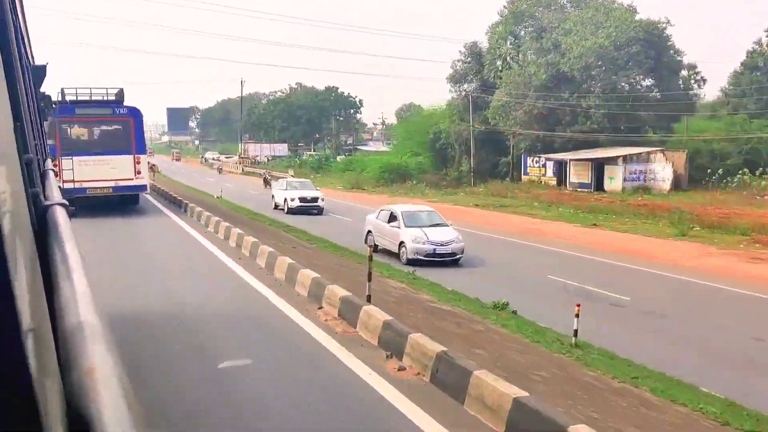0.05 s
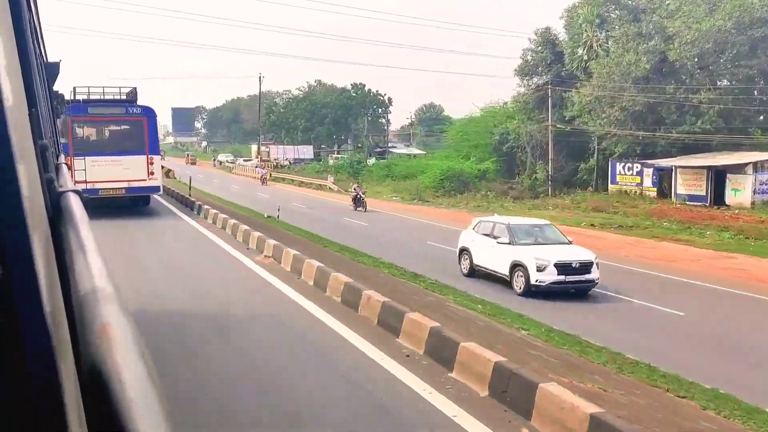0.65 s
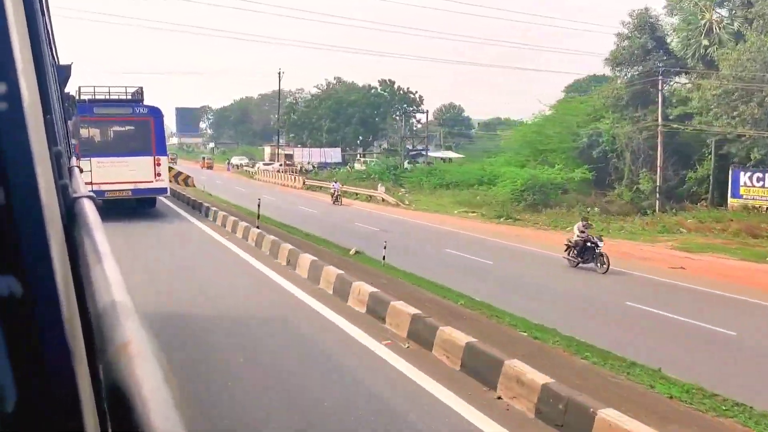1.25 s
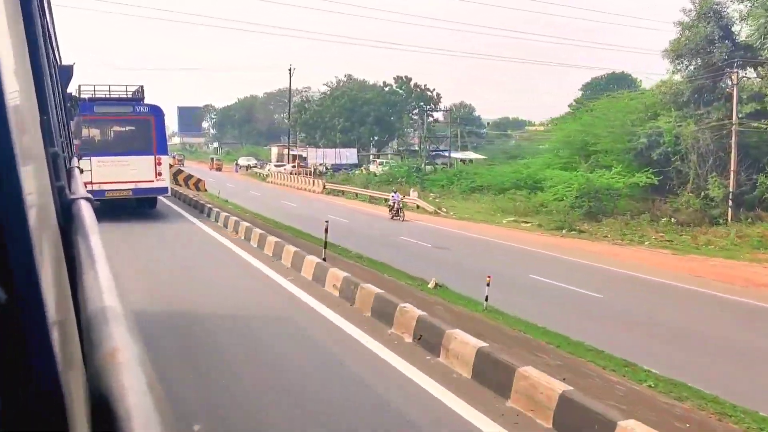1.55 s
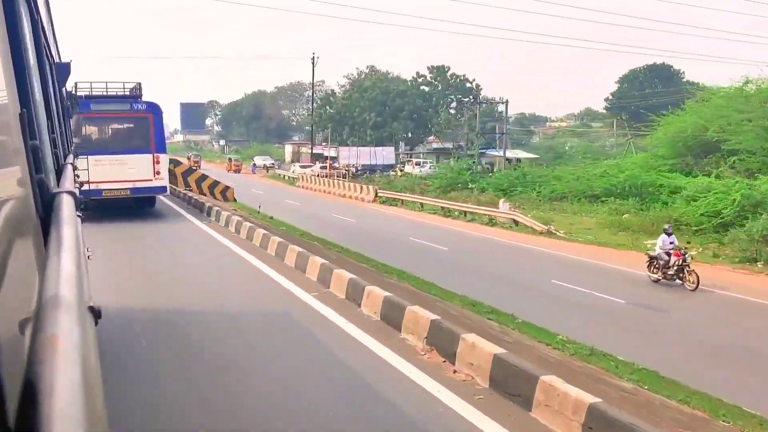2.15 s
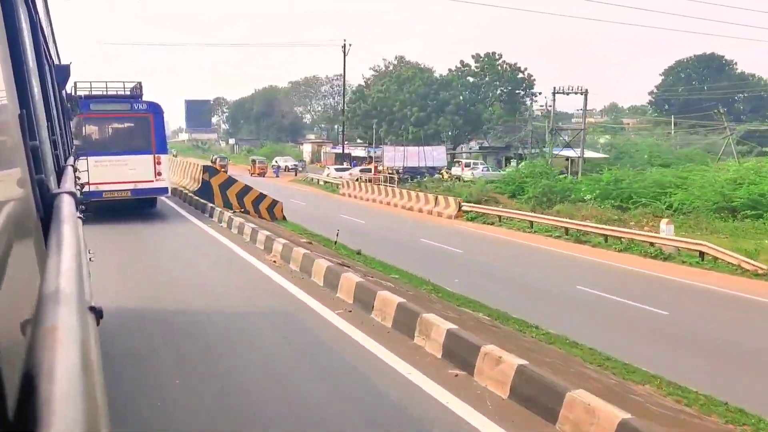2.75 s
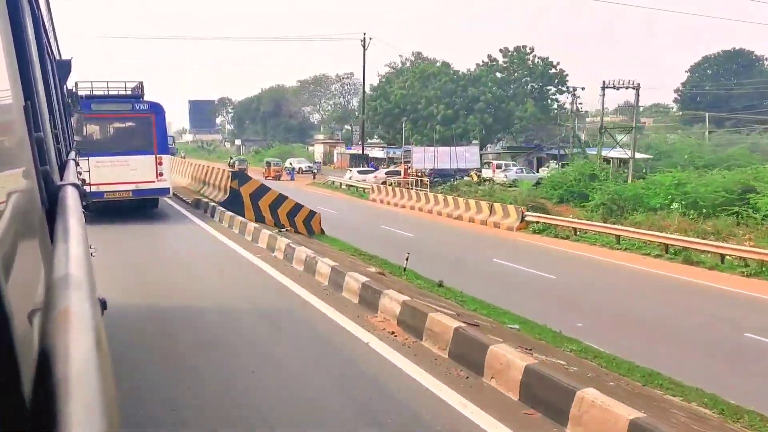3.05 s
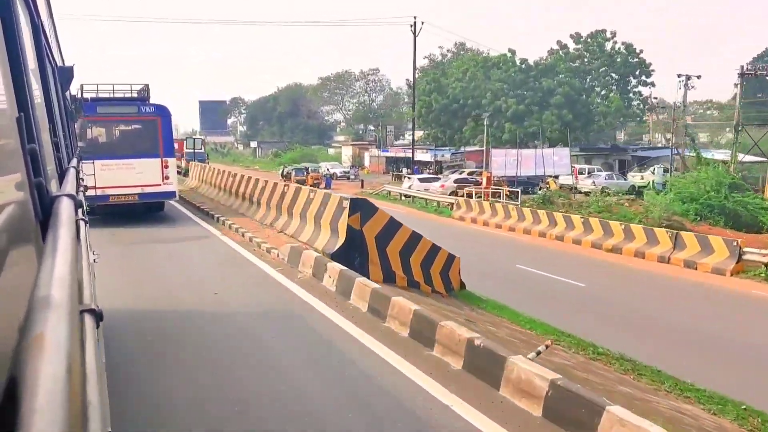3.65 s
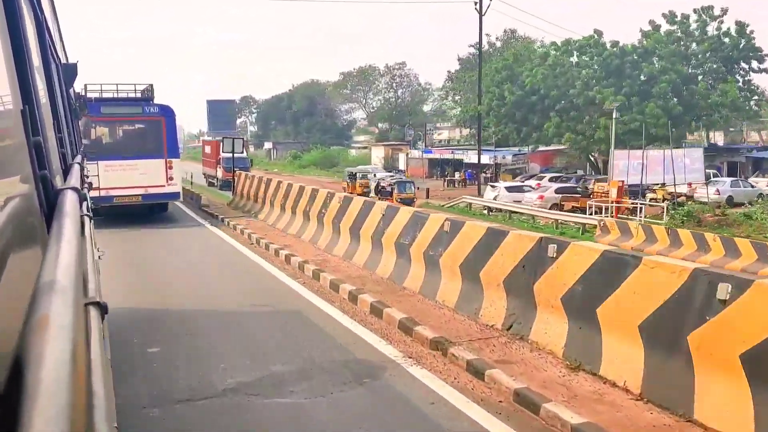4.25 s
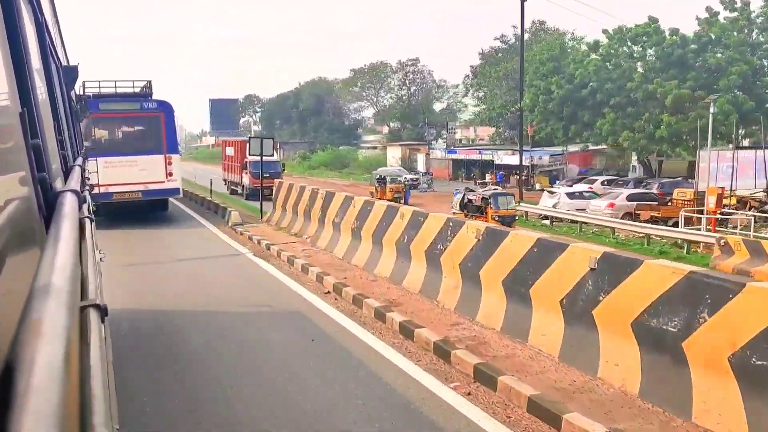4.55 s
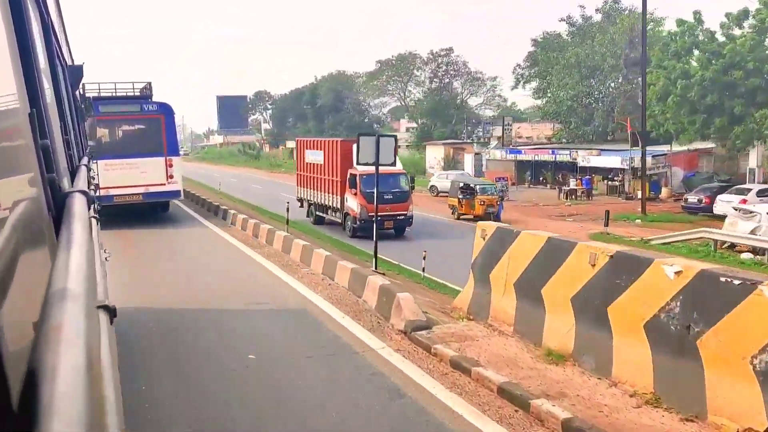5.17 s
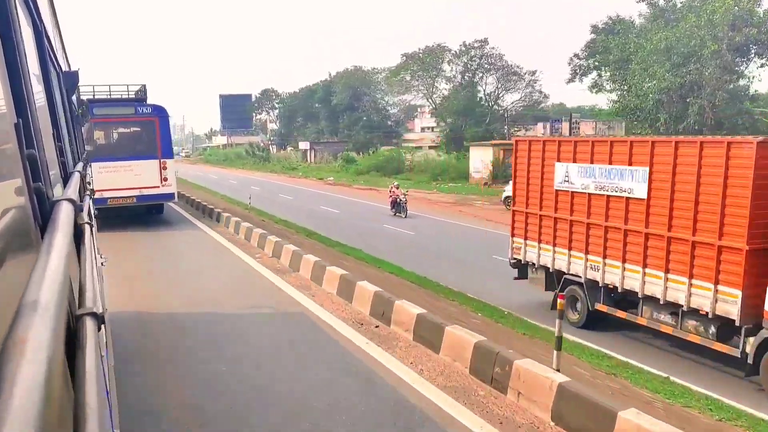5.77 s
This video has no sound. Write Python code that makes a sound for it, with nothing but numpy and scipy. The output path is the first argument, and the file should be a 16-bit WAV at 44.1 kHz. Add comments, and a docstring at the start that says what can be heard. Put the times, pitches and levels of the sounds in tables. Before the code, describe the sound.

Gusty, rumbling wind thumps against the microphone on a highway bus, with road roar behind and a pane squeaking faintly.

```python
"""Wind buffets a microphone held at the open window of a bus on a highway.
The slipstream hammers the exposed right port with eddies and rumbles more softly over the
sheltered left one. Behind it tyres and engine blur into a roar and air hisses past the frame.
The pane sticks and slips in its channel with short squeaks, and the frame ticks once."""
import sys
import numpy as np
from scipy import signal
from scipy.fft import rfft, irfft, next_fast_len
from scipy.io import wavfile
from scipy.ndimage import uniform_filter1d, minimum_filter1d, map_coordinates

SR = 44100
rng = np.random.default_rng(int(sys.argv[2]) if len(sys.argv) > 2 else 0)


def store_wav(level_fs):
    """Save 16-bit WAV to argv[1]."""
    pcm = np.round(np.clip(np.atleast_2d(level_fs), -1, 1) * 32767)
    wavfile.write(sys.argv[1], SR, pcm.T.astype(np.int16))


N = 265041
T = np.arange(N) / SR


def amp(db):
    """Decibels to gain."""
    return 10 ** (np.asarray(db) / 20)


def unit(x):
    """Scale to rms 1."""
    return x / np.sqrt(np.mean(x ** 2) + 1e-20)


def curve(rows):
    """An automation line through (seconds, value) points."""
    return np.interp(T, *np.transpose(rows))


def swells(rows):
    """A curve with one bell for each (middle s, length s, height) row."""
    t = np.arange(0, N / SR, .001)
    bells = sum(height * np.exp(-(2 * (t - s) / length) ** 2) for s, length, height in rows)
    return np.interp(T, t, bells)


def wobble(rate):
    """A smooth random curve, rate knots a second."""
    return map_coordinates(rng.standard_normal(8192), [T * rate + 2], mode="mirror")


def stray(depth_db):
    """Chance swings of level in turbulent air."""
    return depth_db * wobble(rate=18)


def filtered(x, response):
    """Equalise x with a gain given as a function of Hz."""
    size = next_fast_len(N + 8192)
    return irfft(rfft(x, size) * response(np.fft.rfftfreq(size, 1 / SR)), size)[..., :N]


def noise(spectrum):
    """Noise of rms 1 coloured by (Hz, dB) points on a log axis."""
    points_hz, db = np.transpose(spectrum)
    white = rng.standard_normal(N)
    return unit(filtered(white, lambda hz: amp(np.interp(np.log(hz + 1), np.log(points_hz + 1), db))))


def even(x, span_s):
    """Keep the fine texture of x, but hold its level at 1 over span_s."""
    window = signal.windows.hann(2 * int(span_s * SR / 2) + 3)
    power = np.abs(signal.fftconvolve(x ** 2, window / window.sum(), "same"))
    return x / np.sqrt(power + 1e-9)


def patchy(x, depth_db):
    """Give x short-lived patches of random gain over time and frequency."""
    spectra = signal.stft(x, nperseg=1024)[2]
    patches = uniform_filter1d(rng.standard_normal(spectra.shape), size=7, axis=1)
    patches = uniform_filter1d(patches, size=5, axis=2)
    return signal.istft(spectra * amp(depth_db * unit(patches)), nperseg=1024)[1][:, :N]


def swirl(level_db, spectrum, churn_db, churn_rate, span_s):
    """Turbulent pressure: noise that comes in irregular bursts, about churn_rate changes a second."""
    bursts = noise(spectrum) * amp(churn_db * 2 * np.tanh(wobble(churn_rate) / 2))
    return amp(level_db) * even(bursts, span_s)


def sheltered_wind():
    """The sheltered port rumbles softly, and more as the slipstream curls round to it."""
    # Wind reaching this port. Each row: time in seconds, relative strength in dB.
    strength = [(0.0, -5), (0.11, 0), (0.3, -4), (0.46, -6), (1.08, -5.5), (1.2, -3.5), (1.36, -8),
                (1.45, -1), (1.6, -8), (1.72, -6), (1.95, -0.5), (2.1, -4.5), (2.26, -3), (2.35, 2),
                (2.46, 7), (2.53, -0.5), (2.63, 1.5), (2.73, 2), (2.82, 3.5), (3.05, -2), (3.14, 4),
                (3.25, -1.5), (3.42, 2), (3.5, -3.5), (3.62, -2), (3.73, -5), (3.82, 4.5), (4.1, 2),
                (4.25, -0.5), (4.35, 1), (4.53, -1), (4.65, 3.5), (4.9, -0.5), (5.06, 1.5), (5.15, -5),
                (5.24, 0.5), (5.42, 1), (5.55, -0.5), (5.72, 3.5), (5.86, 5), (6.0, 1.5)]
    # Colours of the deep rumble and the buffeting above it. Each row: frequency in Hz, relative dB.
    rumble_colour = [(5, -38), (12, 4.5), (22, 4), (42, 6.5), (70, -9.5), (120, -8), (220, -31.5),
                     (700, -120)]
    buffet_colour = [(35, -34), (80, -5.5), (120, -1.5), (200, -8.5), (300, -17), (450, -29), (650, -30),
                     (1000, -50), (4000, -120)]
    flow_db = curve(strength) + stray(0.8)
    rumble = swirl(flow_db - 13.5, rumble_colour, churn_db=3.5, churn_rate=7.7, span_s=0.11)
    buffet = swirl(flow_db - 27, buffet_colour, churn_db=17, churn_rate=90, span_s=0.061)
    return rumble + buffet


def exposed_wind():
    """One airflow, with its gusts and lulls, drives rumble, buffeting, flutter and small eddies."""
    # Strong eddies crossing the port. Each row: time in seconds, level in dB, centre in Hz, thump in dB.
    strong_eddies = [(0.081, -6, 510, -2.5), (0.149, -16, 764, -24), (0.263, -13, 430, -12),
                     (0.3, -10, 580, -4), (0.538, -3.5, 437, -6), (0.763, -7, 900, -9),
                     (0.791, -11.5, 680, -5), (.865, -30, 560, -21), (0.883, -8.5, 445, -25),
                     (0.931, -11, 860, -22), (1.217, -11, 740, -7), (1.264, -9, 395, -27),
                     (1.305, -21, 480, -25), (1.316, -22, 480, -7), (1.362, -9.5, 780, -22),
                     (1.364, -4.5, 390, -6), (1.567, -9.5, 724, -17), (1.8, -9, 666, -12),
                     (1.869, -11, 690, -20), (1.92, -11.5, 600, -13), (2.12, -18, 510, -20),
                     (2.224, -7, 690, -7), (2.397, -14, 660, -12), (2.454, -15, 480, 1),
                     (2.476, -19, 423, -4), (2.863, -13, 546, -27), (3.033, -12, 520, -17),
                     (3.242, -13, 560, -9), (3.346, -7.5, 650, -16), (3.348, -8, 440, 3.5),
                     (3.395, -20, 650, -13), (3.456, -20, 500, -7), (3.46, -7, 680, -16),
                     (3.526, -11.5, 600, -9.5), (3.624, -11, 393, -17), (3.733, -9.5, 543, -9),
                     (3.772, -17, 560, -24), (3.795, -9, 556, -14), (3.823, -12, 540, -10),
                     (3.832, -15, 700, -23), (3.978, -9.5, 470, -19), (4.26, -9.5, 435, -10),
                     (4.547, -7.5, 520, -18), (4.647, -7.5, 430, -24), (4.917, -18, 490, -20),
                     (4.943, -20, 520, -8), (4.968, -7, 523, -12), (5.192, -11.5, 544, -12),
                     (5.269, -8, 340, -4), (5.669, -9, 500, -10), (5.721, -12, 452, -9)]
    # Gusts. Each row: middle in seconds, length in seconds, rise in dB.
    gusts = [(0.11, 0.1, 2.5), (0.285, 0.04, 4), (0.52, 0.081, 3), (0.96, 0.083, 3), (1.31, 0.038, 6),
             (1.87, 0.096, 5), (2.39, 0.023, 5.5), (2.462, 0.019, 2), (2.85, 0.036, 3.5), (3.1, 0.12, 5),
             (3.33, 0.043, 1.5), (3.82, 0.042, 10.5), (4.92, 0.1, 2), (5.5, 0.047, 3.5)]
    # The slipstream lifts off the port. Each row: middle in seconds, length in seconds, drop in dB.
    lulls = [(0.2, 0.04, 13), (0.41, 0.15, 4), (0.6, 0.078, 8), (0.7, 0.15, 8.5), (0.84, 0.035, 5),
             (1.14, 0.05, 4), (1.43, 0.071, 2.5), (1.68, 0.12, 4.5), (2.19, 0.055, 3), (2.31, 0.05, 5),
             (2.72, 0.18, 4), (3.425, 0.06, 2.5), (3.51, 0.031, 6), (4.05, 0.068, 1.5), (4.2, 0.03, -2),
             (4.47, 0.084, 9.5), (4.59, 0.053, 4.5), (4.79, 0.067, 6), (5.14, 0.15, 8), (5.95, 0.066, 0.5)]
    # Colours of the deep rumble and the buffeting above it. Each row: frequency in Hz, relative dB.
    rumble_colour = [(5, -37), (12, 0.5), (22, -1), (42, -3), (70, -1.5), (100, -14), (160, -30),
                     (500, -120)]
    buffet_colour = [(30, -25), (70, -3), (100, 3), (150, 1), (210, -3.5), (280, -10.5), (400, -22),
                     (1200, -120)]
    # Air rushes in with each strong eddy and slackens in its wake.
    rush_s, rush_db = 0.024, 1.5
    wake_s, wake_db, wake_lag_s = 0.026, 2.5, 0.024
    rush = np.minimum(1, swells([(s, rush_s, 1) for s, *_ in strong_eddies]))
    wake = np.minimum(1, swells([(s + wake_lag_s, wake_s, 1) for s, *_ in strong_eddies]))
    flow_db = swells(gusts) - swells(lulls) + rush_db * rush - wake_db * wake
    push_db = np.minimum(flow_db, 0.8 * flow_db)  # the lows follow all of a lull, only part of a gust
    rumble_db = -12 + push_db + stray(1.8)
    buffet_db = -16.5 + push_db + stray(2.5)
    rumble = swirl(rumble_db, rumble_colour, churn_db=3, churn_rate=61, span_s=0.15)
    buffet = swirl(buffet_db, buffet_colour, churn_db=6.5, churn_rate=90, span_s=0.079)
    stream = surges() + rumble + buffet + flutter(flow_db + stray(1.5))
    # An arriving vortex briefly shields the port: the stronger it is, the more the stream ducks.
    duck_s, duck_db, duck_lead_s = 0.016, -10, 0.001
    cover = swells([(s - duck_lead_s, duck_s, amp(db)) for s, db, *_ in strong_eddies])
    return stream * amp(duck_db * cover) + eddies(strong_eddies + small_eddies(flow_db))


def flutter(flow_db):
    """The air flaps in irregular bursts, darker as they swell; stronger gusts make it louder and brighter."""
    # Midrange flapping of the air. Each row: frequency in Hz, relative level in dB.
    colour = [(70, -58), (190, -7.5), (280, 1), (450, -2), (650, -8), (1000, -15.5), (1500, -23.5),
              (2200, -35), (4000, -44.5), (9000, -120)]
    level_db, split_hz = -24, 800
    speed = 2 * np.tanh(unit(0.96 * wobble(55) + wobble(190)) / 2)
    air = even(noise(colour), span_s=0.049)
    coarse = filtered(air, lambda hz: 1 / (1 + (hz / split_hz) ** 4))
    tearing = (air - coarse) * amp(3.5 * speed + 0.2 * flow_db)
    return amp(level_db + flow_db) * even(coarse * amp(6.1 * speed) + tearing, span_s=0.046)


def road_roar():
    """Tyres and engine merge into a diffuse, slowly shifting roar."""
    # The roar's rise and fall. Each row: time in seconds, base level in dB.
    levels = [(0.0, -40), (0.34, -42.5), (0.9, -43), (1.0, -46), (1.58, -45.5), (1.9, -45.5), (2.82, -44),
              (2.92, -46.5), (3.14, -43.5), (3.9, -45.5), (4.74, -40.5), (4.86, -43.5), (5.36, -40),
              (5.44, -38.5), (5.64, -40.5), (5.98, -38)]
    # Its colour. Each row: frequency in Hz, relative level in dB.
    colour = [(30, -23), (100, -9), (400, 11), (700, 1), (1000, 2), (1500, 0.5), (2200, -4), (3000, -11.5),
              (4000, -47), (8000, -53), (16000, -80)]
    roar = np.array([amp(1.2) * noise(colour), amp(-0.2) * noise(colour)])
    return patchy(roar, depth_db=3.5) * amp(curve(levels) + 1.8 * wobble(15))


def frame_hiss():
    """Air streams past the window frame, its colour always shifting."""
    # Hiss on the near, left side. Each row: time in seconds, base level in dB.
    levels = [(0.0, -46), (0.1, -44.5), (0.2, -50), (0.55, -52), (1.4, -55.5), (1.7, -51.5), (1.95, -50),
              (2.25, -53.5), (2.6, -48.5), (2.95, -51.5), (3.32, -50.5), (3.4, -58.5), (3.55, -52),
              (3.92, -57), (4.65, -50), (4.9, -53.5), (5.3, -49), (5.37, -52.5), (5.41, -43), (5.54, -46),
              (5.63, -49.5), (6.0, -46)]
    # Its colour on each side. Each row: frequency in Hz, relative level in dB.
    near_colour = [(1200, -20), (2600, 3.5), (3800, 1), (4800, 3.5), (5600, -1), (6400, 4.5), (7300, -4.5),
                   (8200, -2), (9200, 0), (11000, -4.5), (13000, -11), (15500, -17)]
    far_colour = [(1200, -9), (2600, -1.5), (3800, -1.5), (5000, -3), (5800, -3.5), (6700, -3.5),
                  (7800, -7.5), (10000, -9.5), (13000, -12), (15500, -19)]
    near_db = curve(levels)
    mean_db = near_db.mean()
    far_db = mean_db - 1 + 0.87 * (near_db - mean_db)  # the far port: softer, with smaller swings
    air = np.array([amp(near_db) * noise(near_colour), amp(far_db) * noise(far_colour)])
    return patchy(air, depth_db=3) * amp(1.3 * wobble(35))


def pane_squeaks():
    """The pane sticks and slips in its channel: short rough squeaks in a dry scrape."""
    # Each row: middle in seconds, length in seconds, pitch in Hz, waver in Hz, tone in dB,
    # scrape in dB, left over right in dB.
    squeaks = [(0.063, 0.09, 9250, 250, -55, -53, 12), (1.475, 0.046, 9240, 260, -61, -57, 13),
               (1.694, 0.086, 3270, 82, -50.5, -60, 7), (1.817, .08, 3270, 59.5, -56, -55, 3),
               (2.164, 0.11, 3120, 211, -58, -57, -7), (2.713, 0.077, 5040, 100, -55, -60, 14),
               (2.85, 0.1, 4850, 90, -61, -68, 3), (3.1, 0.2, 4700, 89, -61, -68, -4),
               (3.16, 0.1, 3800, 300, -65, -57, -7), (3.54, 0.058, 7200, 130, -62, -65, -15),
               (3.62, .03, 7200, 130, -60, -68, -10), (4.708, .03, 4100, 300, -55, -52, 10),
               (4.77, 0.051, 6300, 110, -54.5, -57, 15), (5.235, 0.037, 6260, 130, -54, -61, 13),
               (5.414, .05, 9100, 300, -57, -58, 15), (5.476, 0.065, 2410, 281, -46, -70, 6),
               (5.485, 0.032, 6200, 35, -50.5, -57, 19), (5.54, 0.045, 6190, 30, -49.5, -70, 13),
               (5.53, .07, 8276, 70, -59, -72, 10)]
    out = np.zeros((2, N))
    scrape = noise([(1500, -24), (3000, 9), (5000, 2), (9500, 0), (12000, -3), (15500, -17)])
    drift = np.cumsum(wobble(900)) / SR
    chatter = even(amp(6.5 * wobble(rate=180)), span_s=0.024)  # the pane slips unevenly
    for s, length, hz, waver_hz, tone_db, scrape_db, pan_db in squeaks:
        stroke = np.exp(-(2 * (T - s) / length) ** 2)
        tone = np.sqrt(2) * np.sin(2 * np.pi * (hz * T + waver_hz * drift))
        pan = amp([[pan_db / 2], [-pan_db / 2]])
        out += pan * stroke * (amp(tone_db) * chatter * tone + amp(scrape_db) * scrape)
    return out


def swing(cycles, turn):
    """The brief pressure swing of a passing vortex; turn is its phase in cycles."""
    return (np.exp(2j * np.pi * turn) / (1 - .5j * np.pi * cycles) ** 5).real


def eddies(rows):
    """A vortex on the port is a quick, tearing swing over a thump; weaker swings tumble around it."""
    # Colour of tearing air. Each row: frequency in Hz, relative level in dB.
    tear_colour = [(300, -24), (900, -4.5), (1600, 0), (2500, -12.5), (3700, -21), (4800, -28), (8000, -60)]
    tear_s, tear_db_per_octave = 0.0074, 8.5
    thump_hz, tumble_db, scatter_s = 225, -10, 0.003455
    tear = even(noise(tear_colour), span_s=0.006)
    out = np.zeros(N)
    for s, db, hz, thump_db in rows:
        near = np.abs(T - s) < .04
        t = T[near] - s
        delay, size, turn = rng.standard_normal((3, 5, 1))
        core = swing(hz * t, turn[0])
        tumble_hz = 0.86 * hz * np.exp(0.32 * size)  # five swings, mostly slower than the core
        tumble = swing(tumble_hz * (t - scatter_s * (0.5 + delay)), turn).sum(axis=0)
        tear_db = -23 + tear_db_per_octave * np.log2(hz / 790)  # small, quick eddies tear harder
        rip = amp(tear_db) * np.exp(-(2 * t / tear_s) ** 2) * tear[near]
        thump = amp(thump_db) * swing(thump_hz * t, turn[0] + 0.25)
        out[near] += amp(db) * (core + amp(tumble_db) * tumble + rip) + thump
    return out


def small_eddies(flow_db):
    """Rows for eddies(): lesser vortices that crackle at random and grow with the flow."""
    per_second, centre_hz = 20, 450
    count = int(per_second * N / SR)
    at = rng.integers(N, size=count)
    strength, size = rng.standard_normal((count, 2)).T
    db = -16.5 + 0.47 * flow_db[at] + 3.1 * strength
    thump_db = db - 3.5
    return list(zip(T[at], db, centre_hz * np.exp(0.2 * size), thump_db))


def surges():
    """The largest eddies heave the air in the window opening for a few slow cycles."""
    # Deep surges of pressure. Each row: middle in seconds, length in seconds, level in dB.
    heaves = [(0.127, 0.087, -7), (0.262, 0.089, -6.5), (0.393, .07, -8), (0.7, 0.15, -6.5), (1, 0.14, -10),
              (1.357, 0.1, -8.5), (1.586, 0.12, -8.5), (1.836, 0.14, -8), (2.006, 0.095, -8),
              (2.596, 0.16, -14.5), (3.286, 0.2, -8), (3.864, 0.058, -20), (4.423, 0.049, -10),
              (4.658, 0.092, -7.5), (5.59, 0.29, -7.5)]
    # Their sub-bass colour. Each row: frequency in Hz, relative level in dB.
    colour = [(10, -70), (24, 2), (40, 2), (58, -13), (90, -34), (250, -120)]
    envelope = swells([(s, length, amp(db)) for s, length, db in heaves])
    return envelope * even(noise(colour), span_s=0.039)


def frame_tick():
    """A dry click of the frame, gone in a few milliseconds."""
    # Each row: time in seconds, base level in dB.
    ticks = [(4.41, -34)]
    colour = [(800, -25), (1800, 7), (2700, 11), (4500, -9), (6500, -6), (9000, -4),
              (12000, -14), (15500, -17)]
    strike = sum(amp(db) * np.exp(-np.abs(T - s) / 0.001) for s, db in ticks)
    return strike * np.array([amp(6.5) * noise(colour), amp(4.5) * noise(colour)])


def scene():
    """Wind in front, unrelated on the two ports, and the running bus behind it."""
    wind = np.array([sheltered_wind(), exposed_wind()])
    return wind + road_roar() + frame_hiss() + pane_squeaks() + frame_tick()


def record(dry):
    """A fast, soft limiter rides each channel, then a brick-wall low-pass trims the top."""
    ceiling, top_hz = 0.91, 15450
    needed_gain = (1 + (np.abs(dry) / ceiling) ** 8) ** (-1 / 8)
    gain = uniform_filter1d(minimum_filter1d(needed_gain, size=121), size=121)
    return filtered(dry * gain, lambda hz: hz < top_hz)


dry = scene()
out = record(dry)
store_wav(out)
```